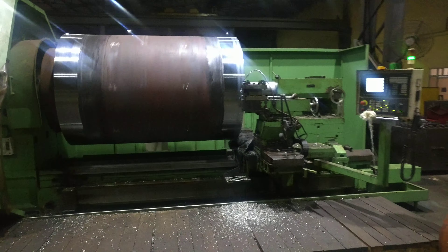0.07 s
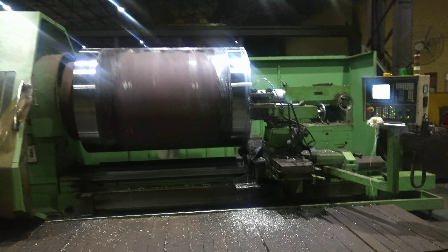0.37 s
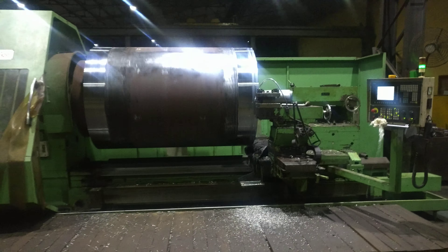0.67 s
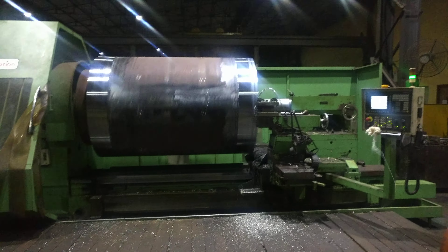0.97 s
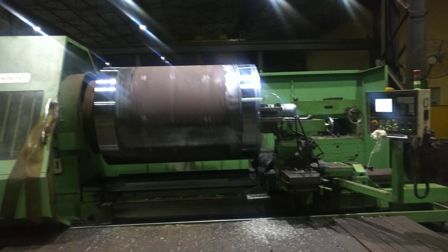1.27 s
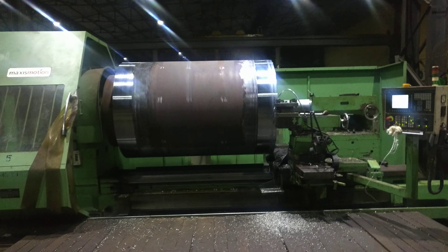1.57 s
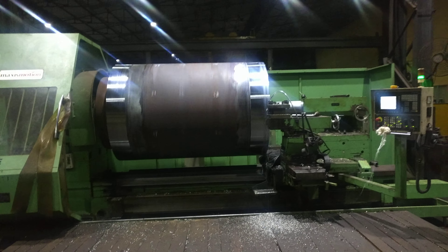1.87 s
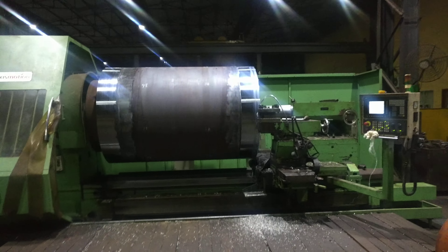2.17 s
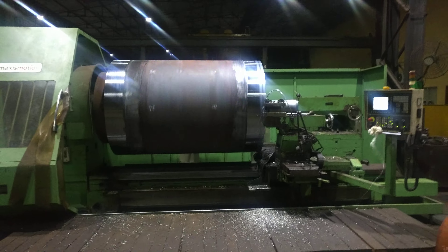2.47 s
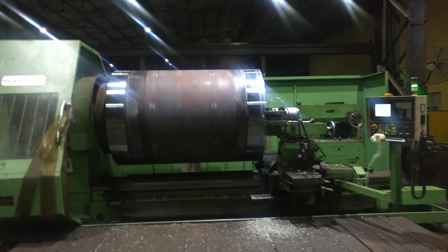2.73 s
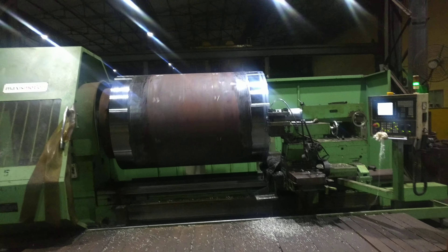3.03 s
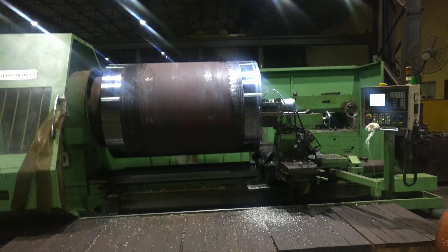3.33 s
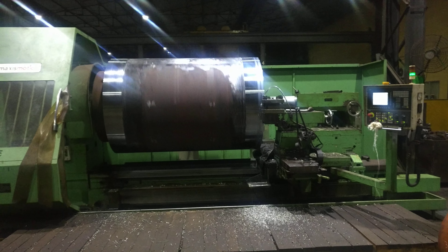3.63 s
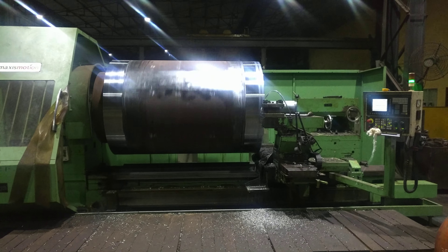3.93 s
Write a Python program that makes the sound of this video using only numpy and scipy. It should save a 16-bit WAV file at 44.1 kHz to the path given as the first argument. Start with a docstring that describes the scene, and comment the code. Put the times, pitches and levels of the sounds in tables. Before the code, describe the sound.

A large lathe cuts a steel drum with a rough, hissing screech that climbs in pitch and dies away halfway. The machine runs on in the workshop with rumble, gear hum, a thin whine and a late dull bump.

```python
"""A workshop, where a large lathe turns a steel drum. The tool sticks and slips, chattering in two
rough bands that climb in pitch, ring the steel and die away after two seconds, with the hiss of
the tearing chip. Underneath run the rumble and gear hum of the headstock, the rush of fans, the
thin switching whine of the drive and a steady high hiss. Near the end the machine gives a dull bump."""
import sys
import numpy as np
from scipy import signal
from scipy.fft import rfft, irfft
from scipy.io import wavfile
from scipy.ndimage import uniform_filter1d, minimum_filter1d, map_coordinates

SR = 44100
rng = np.random.default_rng(int(sys.argv[2]) if len(sys.argv) > 2 else 0)


def transcribe(signal):
    """Save signal, clipped to [-1, 1], as a 16-bit WAV file at the path in sys.argv[1]."""
    frames = np.atleast_2d(signal).T
    limited = np.clip(frames, -1, 1)
    pcm = np.round(limited * 32767).astype(np.int16)
    wavfile.write(sys.argv[1], SR, pcm)


N = 176400


def undb(db):
    """Decibels to gain."""
    return 10 ** (np.asarray(db) / 20)


def unit(x):
    """Scale to rms 1."""
    return x / np.sqrt(np.mean(x ** 2))


def curve(table, column=1):
    """One column of a time table at every sample."""
    rows = np.array(table, float)
    return np.interp(np.arange(N) / SR, rows[:, 0], rows[:, column])


def per_bin(table, column=1):
    """One column of a frequency table at every bin, interpolated over log frequency."""
    rows = np.array(table, float)
    return np.interp(np.log(np.fft.rfftfreq(N, 1 / SR) + 1), np.log(rows[:, 0]), rows[:, column])


def colour(x, spectrum):
    """Filter by a (frequency [Hz], gain [dB]) table."""
    return irfft(rfft(x) * undb(per_bin(spectrum)), N)


def walk(rate_hz):
    """Smooth random curve, spread about 1."""
    steps = rng.standard_normal(8192)
    return map_coordinates(steps, [np.arange(N) / SR * rate_hz], order=3, mode="mirror")


def pan(db):
    """Stereo gains for a left-minus-right level difference."""
    gains = undb(np.vstack([db, -db]) / 2)
    return gains / np.sqrt(np.mean(gains ** 2, axis=0))


def hall(x, t60_s=0.38, tail_db=6, right_lag_s=0.000267):
    """Direct sound, left first, plus the diffuse tail of the workshop."""
    t = np.arange(SR) / SR
    tail = rng.standard_normal((2, SR)) * np.exp(-np.log(1000) * t / t60_s)
    tail *= undb(tail_db) / np.sqrt(np.sum(tail ** 2) / 2)
    hz = np.fft.rfftfreq(N + SR, 1 / SR)
    direct = np.exp(-2j * np.pi * hz * np.array([[0], [right_lag_s]]))
    padded = np.pad(x, (SR, 0), mode="reflect")
    wet = irfft(rfft(padded) * (direct + rfft(tail, N + SR)), N + SR)
    return wet[:, SR:] / np.hypot(1, undb(tail_db))


def tone(hz, drift, waver_db, rate_hz, left_lag_s=0):
    """Stereo machine tone, wavering in pitch and level."""
    cycles = np.cumsum(hz * (1 + drift * walk(rate_hz))) / SR
    phase = 2 * np.pi * (cycles - hz * np.array([[left_lag_s], [0]]))
    return unit(np.sin(phase) * undb(waver_db * walk(rate_hz)))


# Hiss spectrum (frequency [Hz], gain [dB])
HISS_SPECTRUM = [(2000, -56), (8500, -24), (10400, -13.5), (11100, -6), (12700, -10), (14000, -2.5),
                 (15500, -1), (16500, -17)]
# Hiss envelope (time [s], level [dB])
HISS_ENVELOPE = [(0, -42.5), (1.5, -43.5), (2.7, -43), (3.3, -44), (4, -41.5)]


def high_hiss():
    """Steady noise, mostly above 10 kHz."""
    noise = unit(colour(rng.standard_normal((2, N)), HISS_SPECTRUM))
    return noise * undb(curve(HISS_ENVELOPE) + .5 * walk(20)) * pan(db=6.5)


# Fan and spindle noise (frequency [Hz], gain [dB])
RUSH_SPECTRUM = [(200, -45), (1000, -18), (1900, -6), (2220, 3), (2500, 0), (3200, -2), (4200, -1.5),
                 (5000, -4), (6000, -6.5), (7000, -18), (8500, -26), (16000, -40)]


def fan_rush(level_db=-35.5):
    """Broadband rush of fans and spindle."""
    noise = unit(colour(rng.standard_normal((2, N)), RUSH_SPECTRUM))
    return noise * undb(level_db + 0.41 * walk(10)) * pan(db=-7.5)


# Headstock noise (frequency [Hz], gain [dB])
RUMBLE_SPECTRUM = [(20, -36), (40, -19), (60, -4), (110, 0), (220, 0), (320, -3), (410, -11), (520, -7),
                   (650, -4), (900, -6), (1400, -7), (2000, -10), (3000, -25), (6000, -50)]
# Left-right likeness (frequency [Hz], coherence [0-1])
RUMBLE_COHERENCE = [(60, 0.97), (130, 1), (290, 0.9), (640, 0.56), (1300, 0.13), (16000, 0.26)]
# Rumble envelope (time [s], level [dB])
RUMBLE_ENVELOPE = [(0, -37), (.8, -37), (1.6, -38), (2.2, -36.5), (3, -36), (4, -36.5)]
# Bass shelf on the rumble (time [s], gain [dB])
BASS_SHELF = [(0, 0.5), (.8, 1), (1.6, 3), (2.2, -2), (2.9, -3.5), (3.4, 0.5), (4, 0.5)]


def headstock_rumble(shelf_hz=200):
    """Low noise of the headstock: centred in the bass, wide higher up."""
    mid, side = rfft(rng.standard_normal((2, N)))
    coherence = np.clip(per_bin(RUMBLE_COHERENCE), -1, 1)
    noise = irfft(mid * np.sqrt(1 + coherence) + side * np.sqrt(1 - coherence) * [[1], [-1]], N)
    rumble = unit(colour(noise, RUMBLE_SPECTRUM)) * undb(curve(RUMBLE_ENVELOPE))
    bass = signal.sosfiltfilt(signal.butter(2, shelf_hz, fs=SR, output="sos"), rumble)
    return rumble + bass * (undb(curve(BASS_SHELF)) - 1)


# Gear tone envelope (time [s], level [dB])
GEAR_ENVELOPE = [(0, -43), (.3, -50.5), (.6, -50.5), (1.3, -53.5), (1.8, -50.5), (2.1, -43.5),
                 (2.25, -46.5), (2.4, -39.5), (2.75, -36), (2.88, -38), (3.03, -43), (3.55, -43.5),
                 (4, -50.5)]
# Motor and gear partials (frequency [Hz], level [dB], left-right [dB])
HUM_PARTIALS = [(97.6, -60.5, 0.5), (181.3, -63, -1), (209.5, -53.5, -0.5), (293.5, -58, -2),
                (338.6, -55.5, -5.5), (346.5, -50.5, 0), (815, -56.5, -3), (1046, -56.5, -7),
                (2175, -61.5, 7), (2202, -49.5, 30), (2556, -52, 43)]


def gear_hum(gear_hz=566):
    """One swelling gear tone over the steady hum of motor and gears."""
    gear = tone(gear_hz, drift=0.0019, waver_db=1, rate_hz=12) * undb(curve(GEAR_ENVELOPE))
    hum = sum(tone(hz, drift=0.001504, waver_db=2, rate_hz=14) * undb(db) * pan(pan_db)
              for hz, db, pan_db in HUM_PARTIALS)
    return gear * pan(db=3) + hum


# Switching lines (offset from carrier [multiples of drive frequency])
WHINE_OFFSETS = [-7.95, -1, 0, 1, 7.92]
# Same lines (base level [dB], left-right [dB])
WHINE_LINES = [(-49, -4), (-37.5, -7.5), (-48, -24), (-36.5, -16), (-58, -15)]
# Whine swell (time [s], gain [dB])
WHINE_SWELL = [(0, -5), (2.25, -5), (2.55, .5), (3.3, .5), (3.6, -1), (4, 0)]


def drive_whine(carrier_hz=4000, drive_hz=52.6):
    """Switching carrier of the drive with four sidebands."""
    whine = 0
    for offset, (db, pan_db) in zip(WHINE_OFFSETS, WHINE_LINES):
        hz = carrier_hz + offset * drive_hz
        line = tone(hz, drift=.00008, waver_db=1.8, rate_hz=5.78, left_lag_s=.000073)
        whine += line * undb(db) * pan(pan_db)
    return whine * undb(curve(WHINE_SWELL))


# Thud spectrum (frequency [Hz], gain [dB])
BUMP_SPECTRUM = [(60, -28), (140, -6), (215, -1), (300, -9), (450, -20), (900, -18), (3000, -60)]


def bump(start_s=3.75, rise_s=0.039, level_db=-37.5):
    """Dull thud in the machine: low noise that swells and dies."""
    age = np.maximum(np.arange(N) / SR - start_s, 0) / rise_s
    noise = unit(colour(rng.standard_normal(N), BUMP_SPECTRUM))
    return noise * age * np.exp(1 - age) * undb(level_db)


# Fracture spectrum (frequency [Hz], gain [dB])
CHIP_SPECTRUM = [(1500, -25), (2300, -5), (2900, -25), (3400, -11), (4500, 4.5), (5500, 3), (6300, -7.5),
                 (7000, -20), (8000, -36), (10000, -30), (11500, -30), (16000, -34)]
# Chip envelope, briefly freer as the chatter fades (time [s], level [dB])
CHIP_ENVELOPE = [(0, -24), (.8, -27), (1.4, -28), (1.7, -31.5), (1.85, -26), (2.0, -29.5), (2.2, -34),
                 (2.42, -41), (2.8, -78)]


def tearing_chip(cracks_per_s=5000, scatter_db=2.5):
    """Tiny fractures merge into a gritty hiss."""
    onsets = rng.random(N) < cracks_per_s / SR
    cracks = onsets * rng.standard_normal(N) * undb(scatter_db * walk(200))
    grit = unit(colour(cracks, CHIP_SPECTRUM)) * undb(curve(CHIP_ENVELOPE))
    return hall(grit) * pan(db=-12)


# Tool and drum modes (frequency [Hz], bandwidth [Hz], peak re direct path [dB])
STEEL_MODES = [(2610, 62, -17), (2947, 25, -1), (3250, 54, -10), (3666, 70, -5.5), (3920, 29, -11),
               (4070, 24, -8), (4310, 50, -5)]


def ring_steel(x):
    """Add the resonances of tool and drum; output at rms 1."""
    bin_hz = np.fft.rfftfreq(N, 1 / SR) + 1
    modes = sum(undb(db) / (1 + 1j * hz / width_hz * (bin_hz / hz - hz / bin_hz))
                for hz, width_hz, db in STEEL_MODES)
    return unit(irfft(rfft(x) * (1 + modes), N))


# Chatter bands (time [s], lower pitch [Hz], lower level [dB], upper pitch [Hz], upper level [dB],
# pitch scatter [fraction])
CHATTER_BANDS = [(0, 2736, -18, 3699, -14, 0.0852), (.12, 2811, -16.5, 3735, -17, .08),
                 (.25, 2912, -17.5, 3760, -17, 0.069), (.35, 2943, -18, 3790, -15.5, .07),
                 (.55, 3028, -20, 3900, -17.5, 0.081), (.62, 3070, -19.5, 3917, -15, 0.084),
                 (.78, 3118, -19.5, 3980, -17.5, 0.081), (.88, 3158, -24, 4000, -16.5, 0.082),
                 (1.08, 3262, -19, 4080, -17.5, 0.084), (1.22, 3273, -20.5, 4170, -16, 0.087),
                 (1.38, 3346, -23.5, 4220, -17.5, 0.081), (1.47, 3416, -22, 4267, -17.5, .085),
                 (1.6, 3450, -24, 4350, -18.5, 0.093), (1.71, 3505, -25.5, 4440, -16.5, 0.092),
                 (1.8, 3518, -27.5, 4465, -25, 0.0934), (2.05, 3553, -32.5, 4440, -36, .1),
                 (2.3, 3660, -39, 4480, -48, 0.128), (2.5, 3550, -95, 4730, -95, 0.099)]
# Contact points: one nearly sings, the others rasp (scatter multiplier [ratio])
CONTACT_ROUGHNESS = [0.56, 1., 1.25]
# Overtone radiation of the tool (frequency [Hz], gain [dB], left-right [dB])
TOOL_RADIATION = [(5150, -3, -6), (6160, 3, -20), (6660, -2, -16), (7330, -8.5, -7.5), (8400, -13, -2.5),
                  (9700, -9.5, -1), (10700, -13.5, 0), (11300, -13.5, 0), (13000, -10, -4), (16000, -21, 3)]


def tool_chatter():
    """The edge sticks and slips in two modes at three points, each jittering in pitch and strength."""
    wander, wander_rate_hz, surge_db = .022, 16, 2
    slip_rate_hz, slip_db = 500, 2.65
    full_chatter_db, octave_db, twelfth_db = -17.5, -13.5, -20.5
    scatter = curve(CHATTER_BANDS, column=5)
    squeal = overtones = 0
    for pitch_column, level_column in ((1, 2), (3, 4)):
        band_hz = curve(CHATTER_BANDS, pitch_column)
        band_db = curve(CHATTER_BANDS, level_column)
        harshness = undb(band_db - full_chatter_db)  # overtones fade faster than the squeal
        for roughness in CONTACT_ROUGHNESS:
            detune = wander * walk(wander_rate_hz) + roughness * scatter * walk(slip_rate_hz)
            phase = 2 * np.pi * np.cumsum(band_hz * (1 + detune)) / SR
            force = undb(band_db + surge_db * walk(wander_rate_hz))
            grip = undb(slip_db * walk(slip_rate_hz))
            fundamental, octave, twelfth = (unit(grip * np.sin(k * phase)) for k in (1, 2, 3))
            squeal += hall(ring_steel(fundamental) * force)
            overtones += force * harshness * (octave * undb(octave_db) + twelfth * undb(twelfth_db))
    radiated = hall(colour(overtones, TOOL_RADIATION))
    sizzle = irfft(rfft(radiated) * pan(per_bin(TOOL_RADIATION, column=2)), N)
    return (squeal * pan(db=-7) + sizzle) / np.sqrt(len(CONTACT_ROUGHNESS))


def scene():
    """The cut over the running machine."""
    cut = tool_chatter() + tearing_chip()
    return cut + gear_hum() + drive_whine() + headstock_rumble() + fan_rush() + high_hiss() + bump()


def record(dry):
    """Peak limiter, then a steep low-pass."""
    ceiling, window_s, cutoff_hz = .85, .004, 15850
    span = int(window_s * SR)
    needed_gain = ceiling / np.maximum(np.abs(dry).max(axis=0), ceiling)
    gain = uniform_filter1d(minimum_filter1d(needed_gain, span), span)
    return signal.sosfilt(signal.ellip(12, .1, 80, cutoff_hz, fs=SR, output="sos"), dry * gain)


dry = scene()
out = record(dry)
transcribe(out)
```